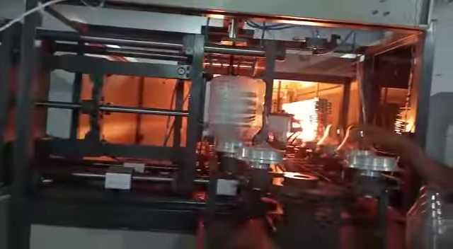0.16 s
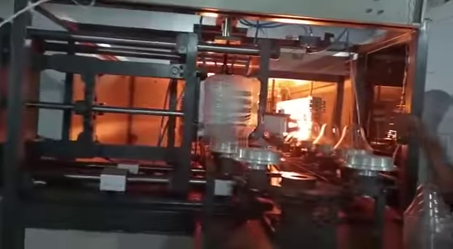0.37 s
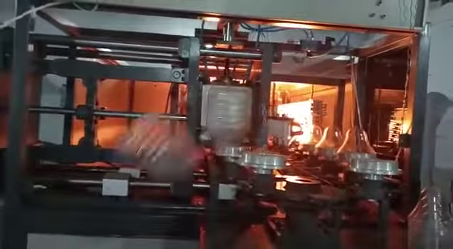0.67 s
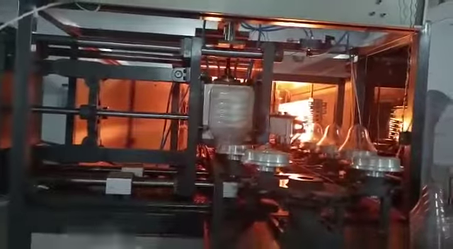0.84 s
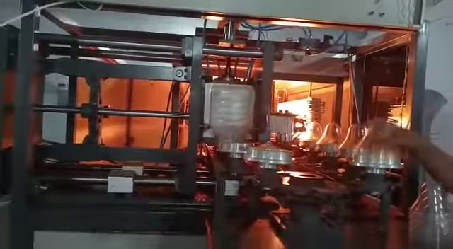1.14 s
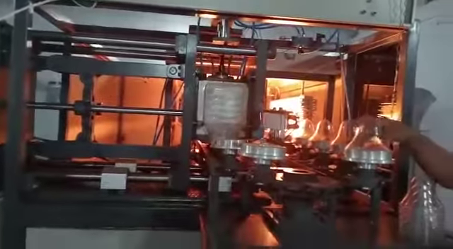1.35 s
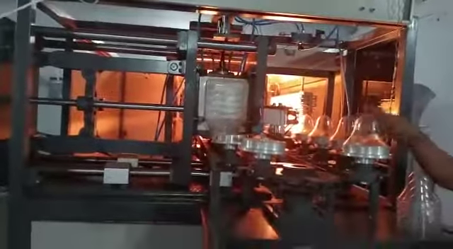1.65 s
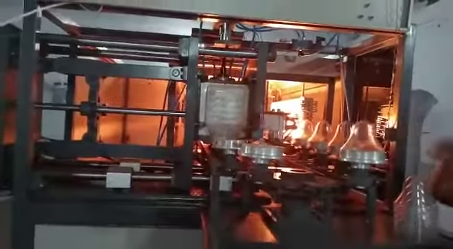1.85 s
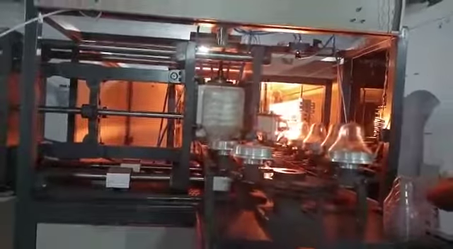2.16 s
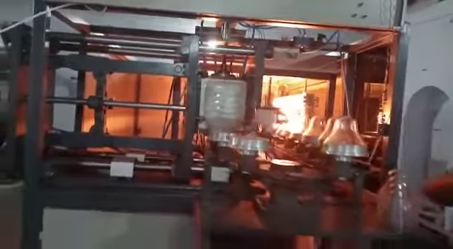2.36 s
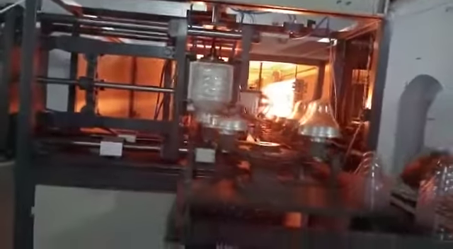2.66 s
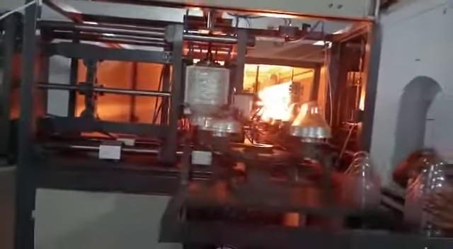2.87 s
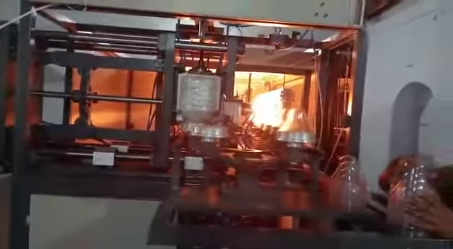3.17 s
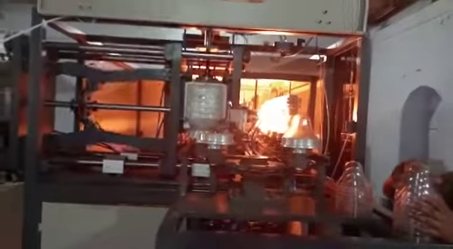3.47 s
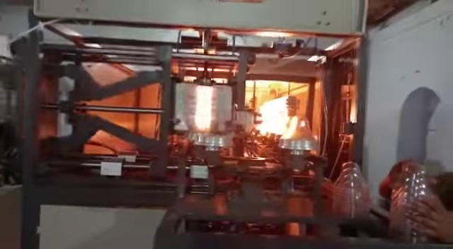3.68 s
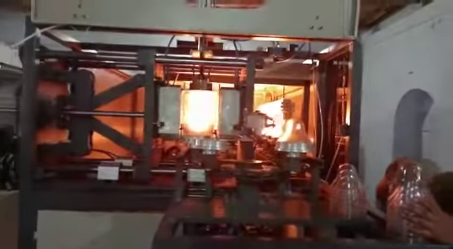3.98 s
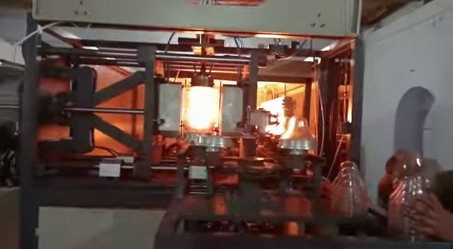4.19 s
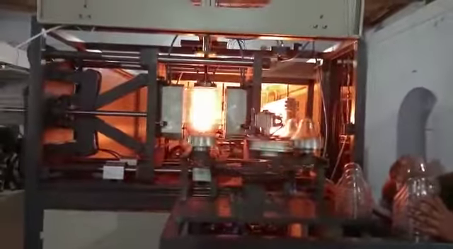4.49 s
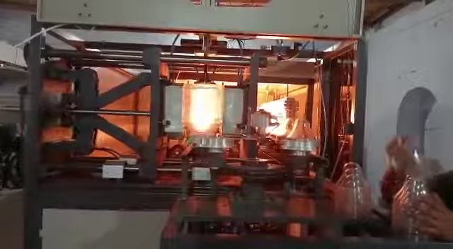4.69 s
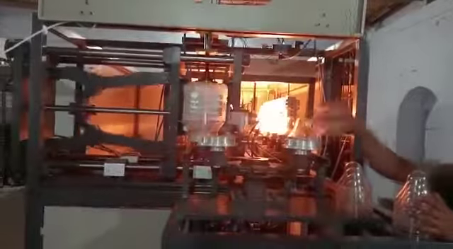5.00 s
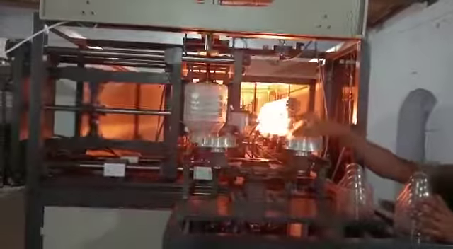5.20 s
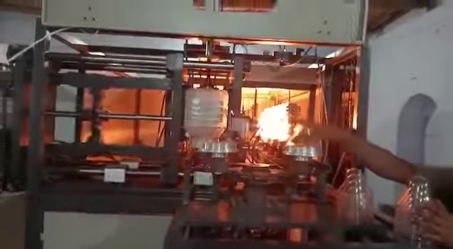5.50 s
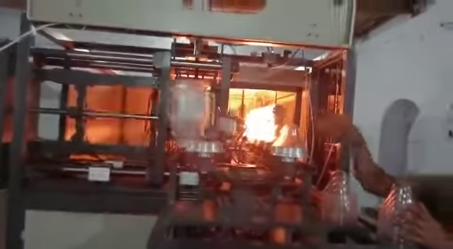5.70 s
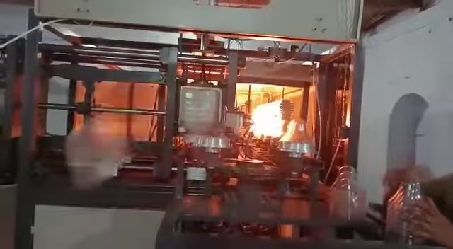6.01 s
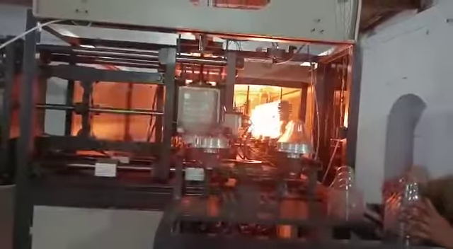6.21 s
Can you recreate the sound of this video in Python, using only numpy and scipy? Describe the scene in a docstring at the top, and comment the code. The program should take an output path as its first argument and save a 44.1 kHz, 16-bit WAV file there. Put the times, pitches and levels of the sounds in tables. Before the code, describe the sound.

Pneumatic bottle-blowing machine cycles with loud bursts of hissing compressed air, metallic knocks and sliding carriage rumble over a throbbing compressor and fan rush.

```python
"""A fading hiss and muffler roar open the scene: a pneumatic bottle-blowing machine in a hard-walled workshop.
Its valves release jets of coloured noise; gliding noise bands make the mufflers roar and the jets whistle.
The carriage rumbles in shaped noise, the frame knocks in short noise bursts, and a plastic bottle clatters.
Behind it an air compressor throbs as a sum of turning-rate multiples, over the noise of fans and shop.
One small microphone feeds both channels."""
import sys
import numpy as np
from scipy import signal
from scipy.fft import rfft, irfft, next_fast_len
from scipy.io import wavfile
from scipy.ndimage import uniform_filter1d

SR = 44100
rng = np.random.default_rng(int(sys.argv[2]) if len(sys.argv) > 2 else 0)


def materialize(psi):
    """Save the field psi as 16-bit PCM at rate SR to the path in sys.argv[1].

    A 1-D psi becomes a single channel; in a 2-D psi each row is a channel.
    """
    bounded = np.clip(np.atleast_2d(psi).T, -1, 1)
    quanta = np.round(bounded * 32767).astype(np.int16)
    wavfile.write(sys.argv[1], SR, quanta)


N = 279989  # length in samples


def from_db(db):
    """Amplitude factor for a level in dB."""
    return 10 ** (np.asarray(db) / 20)


def rms_one(x):
    """Scale a signal to rms 1."""
    return x / np.sqrt(np.mean(x ** 2) + 1e-20)


def seconds():
    """The time of every sample."""
    return np.arange(N) / SR


def in_time(rows):
    """Each column of a curve, joined by straight lines, at every sample."""
    s, *columns = np.transpose(rows)
    return [np.interp(seconds(), s, column) for column in columns]


def drift(hz):
    """Slow chance with rms 1, weaker above the given rate; drawn at every 40th sample."""
    coarse = np.arange(0, N + 40, 40)
    rates = np.fft.rfftfreq(len(coarse), coarse[1] / SR)
    smooth = 1 / (1 + (rates / hz) ** 2)
    slow = irfft(rfft(rng.standard_normal(len(coarse))) * smooth, len(coarse))
    return np.interp(np.arange(N), coarse, rms_one(slow))


def noise(spectrum, band=(0, np.inf)):
    """Noise of a given colour, with rms 1 inside the band."""
    size = next_fast_len(N, True)
    hz = np.fft.rfftfreq(size, 1 / SR)
    points, db = np.transpose(spectrum)
    colour = from_db(np.interp(np.log(hz + 1), np.log(points), db))
    low_fade = hz / (hz + points[0] / 2)
    bins = rfft(rng.standard_normal(size)) * colour * low_fade
    inside = irfft(bins * (hz >= band[0]) * (hz < band[1]), size)
    return irfft(bins, size)[:N] / np.std(inside)


def resonate(x, modes):
    """Parallel two-pole resonances, each with its peak gain near its dB value."""
    out = 0
    for hz, width_hz, db in modes:
        r = np.exp(-np.pi * width_hz / SR)
        zeros = np.array([1, 0, -1]) * (1 - r * r) / 2
        poles = [1, -2 * r * np.cos(2 * np.pi * hz / SR), r * r]
        out = out + from_db(db) * signal.lfilter(zeros, poles, x + 1e-18)
    return out


def cut(x, hz, kind, order=2):
    """Butterworth filter."""
    sos = signal.butter(order, np.clip(hz, 10, .45 * SR), kind, fs=SR, output="sos")
    return signal.sosfilt(sos, x)


def gliding_band(hz, width_hz, order=2):
    """Turbulence in a resonance whose centre moves: low noise shifted up to a phase; rms 1."""
    real, imaginary = cut(rng.standard_normal((2, N)), width_hz / 2, "low", order=order)
    phase = 2 * np.pi * np.cumsum(hz) / SR
    return rms_one(real * np.cos(phase) + imaginary * np.sin(phase))


def gate(start, end, attack_s, t60):
    """Fully open at the start, dying away after the end by 60 dB in t60 seconds."""
    out = np.zeros(N)
    first = max(0, int((start - attack_s) * SR))
    at = np.arange(first, min(N, int((end + 1.5 * t60) * SR)))
    t = at / SR
    rise = np.clip((t - start) / attack_s + 1, 0, 1)
    out[at] = rise * np.exp(-np.log(1000) * np.maximum(t - end, 0) / t60)
    return out


def gate_rows(rows, attack_s, t60):
    """A gate held open from the first to the last row of a table."""
    return gate(rows[0][0], rows[-1][0], attack_s, t60)


def reflections(x, longest_s, echo_db, count=10):
    """Nearby steel panels return faint copies that ripple the spectrum."""
    out, gain = x.copy(), from_db(echo_db)
    for share in rng.uniform(.1, 1, count):
        lag = 1 + int(share * longest_s * SR)
        out[lag:] += gain * x[:-lag]
    return out / np.sqrt(1 + count * gain ** 2)


def flecks(x, depth_db, size):
    """A turbulent jet's colour keeps shifting: narrow bands flare and fade."""
    cells = signal.stft(x, nperseg=512)[2]
    patch = rng.standard_normal(cells.shape)
    for _ in range(2):
        patch = uniform_filter1d(patch, size=3, axis=0)
        patch = uniform_filter1d(patch, size, axis=1)
    flickering = signal.istft(cells * from_db(depth_db * rms_one(patch)))[1][:N]
    return np.std(x) * rms_one(flickering)


def ringing(bursts, modes):
    """Resonances excited by noise, let out in dying bursts."""
    push = sum(from_db(db) * gate(s + 0.0022, s, attack_s=0.0024, t60=t60) for s, db, t60 in bursts)
    return push * rms_one(resonate(rng.standard_normal(N), modes))


def tone(rows, width_hz):
    """A noisy, loosely pitched note."""
    hz, db = in_time(rows)
    return from_db(db) * gate_rows(rows, attack_s=.02, t60=0.2) * gliding_band(hz, width_hz)


TURN_S = 0.07254  # one turn of the compressor
FIRST_ORDER, LAST_ORDER = 7, 60  # multiples of the turning rate
# The multiples above the table: relative level of the first, and the slope from there
OVERTONE_DB, OVERTONE_DB_PER_OCTAVE = -10, -12.5
# The compressor's lowest multiples, from FIRST_ORDER upwards. Each entry: relative level in dB.
ORDER_DB = [-6, -0.5, -15, -6, 1.5, -9.5, -4, -5.5, -29, -6.5, -6.5]
# Beats within every turn, which set the phases. Each row: seconds into the turn, weight in dB, centre in Hz.
STROKES = [(0.0315, 3.5, 113), (0.0505, -7, 205), (0.0588, -6, 245), (0.0047, -9.5, 190)]


def compressor():
    """Multiples of the turning rate, phased by four strokes, throb; the room smears them and a leak spits in step."""
    orders = np.arange(FIRST_ORDER, LAST_ORDER + 1)
    hz, higher = orders / TURN_S, orders[len(ORDER_DB):]
    overtones_db = OVERTONE_DB + OVERTONE_DB_PER_OCTAVE * np.log2(higher / higher[0])
    levels_db = np.concatenate([ORDER_DB, overtones_db])
    beats = 0
    for s, db, centre in STROKES:
        weight = from_db(db) / (1 + (hz / centre - centre / hz) ** 2 * 2)
        beats = beats + weight * np.exp(-2j * np.pi * hz * s)
    # chance phases grow with the order
    smear = rng.standard_normal(len(orders)) * (orders / 22) ** 4
    phases = np.angle(beats) + smear
    turn = np.linspace(0, TURN_S, 2048)
    cycle = from_db(levels_db) @ np.cos(2 * np.pi * np.outer(hz, turn) + phases[:, None])
    thump = rms_one(np.interp(seconds() % TURN_S, turn, cycle))
    pulse_db = 2.0 * np.cos(2 * np.pi * (seconds() - .068) / TURN_S)
    spit = from_db(pulse_db) * gliding_band(np.full(N, 9300), width_hz=1200)
    return thump * from_db(0.97 * drift(9.4)) + from_db(-8.5) * spit


# Levels when the throb is at -30 dB (the rush before its low cut), and their shares of the throb's swing in dB
SHOP_DB, SHOP_FOLLOWS = -29, 0.84
RUMBLE_DB, RUMBLE_FOLLOWS = -36, .5
# The level of the throb, which the shop's rush and rumble partly follow; it swells and sinks and is lowest
# during many blasts. Each row: time in seconds, level in dB.
THROB_LEVEL = [(0, -30.5), (0.22, -25.5), (0.3, -35), (0.82, -38.5), (0.92, -31.5), (1.68, -31.5),
               (1.85, -36), (2.2, -33), (2.58, -28.5), (2.8, -21), (3.23, -21.5), (3.33, -29), (3.6, -48),
               (4.0, -37), (4.3, -32), (4.55, -32.5), (4.9, -41.5), (5.2, -34), (5.45, -27), (5.65, -30.5),
               (6.0, -41), (6.15, -30)]
# Colour of the fans' rush across the shop. Each row: frequency in Hz, relative density in dB.
SHOP_COLOUR = [(240, 6), (420, -1.5), (1030, -3.4), (1320, -5.5), (2250, -3.5), (4270, -16), (5210, -13.5),
               (7180, -18), (9160, -25), (10400, -20.5), (15400, -26)]
# Colour of the shop's low rumble. Each row: frequency in Hz, relative density in dB.
SHOP_BASS_COLOUR = [(20, -20), (45, -10), (75, -3), (120, 6), (190, 1), (330, -9), (600, -28)]


def background():
    """The compressor over the rush of oven fans and the low rumble of the shop, swelling together."""
    throb_db, = in_time(THROB_LEVEL)
    swing_db = throb_db + 30
    rush = cut(flecks(noise(SHOP_COLOUR), depth_db=1.5, size=10), 266, "high", order=3)
    shop = from_db(SHOP_DB + SHOP_FOLLOWS * swing_db) * rush
    rumble = from_db(RUMBLE_DB + RUMBLE_FOLLOWS * swing_db) * noise(SHOP_BASS_COLOUR)
    return from_db(throb_db) * compressor() + shop + rumble


# A plastic bottle strikes. Each row: start in seconds, level before the treble cut in dB,
# 60 dB decay in seconds, top of the contact's brightness in Hz.
CLATTER = [(1.179, -22, 0.08, 8500), (1.246, -14.5, 0.12, 5900), (1.268, -9.5, 0.091, 4800),
           (1.312, -19, 0.034, 6000)]
# Resonances of the bottle's thin wall. Each row: centre in Hz, width in Hz, relative gain in dB.
BOTTLE_WALL = [(2970, 530, 2), (3880, 430, 2.5), (5430, 680, -1), (7000, 800, -2)]


def bottle():
    """A falling bottle's contacts sound its thin wall, each contact with its own upper limit."""
    out = 0
    for s, db, t60, top_hz in CLATTER:
        out = out + cut(ringing([(s, db, t60)], BOTTLE_WALL), top_hz, "low", order=6)
    return out


# Dry guides squeak, one table each. Each row: time in seconds, pitch in Hz, level in dB.
SQUEAKS = [
    [(4.475, 1866, -38), (4.5, 2080, -37), (4.525, 2150, -34)],
    [(5.685, 2570, -24), (5.705, 2560, -26)],
    [(5.745, 2065, -24), (5.765, 1960, -24)],
    [(6.055, 1065, -27), (6.08, 1080, -35)],
]


def squeaks():
    """Each dry guide gives one thin line that wavers in pitch and flutters in level."""
    out = 0
    for rows in SQUEAKS:
        hz, db = in_time(rows)
        wavering_hz = hz + 45 * drift(100)
        line = np.sqrt(2) * np.sin(2 * np.pi * np.cumsum(wavering_hz) / SR)
        out = out + from_db(db + 2 * drift(25)) * gate_rows(rows, attack_s=0.023, t60=0.083) * line
    return out


# Blows on the frame. Each row: start in seconds, level in dB, centre in Hz, 60 dB decay in seconds.
KNOCKS = [(0.208, -19.5, 238, 0.13), (0.308, -19, 449, 0.32), (0.549, -25, 2000, 0.046),
          (0.599, -18, 430, 0.28), (0.661, -18, 447, 0.14), (0.69, -17.5, 740, 0.27),
          (0.738, -14.5, 300, 0.054), (0.84, -21, 1080, 0.05), (1.18, -22.5, 1380, 0.36),
          (1.194, -25, 1250, 0.15), (1.207, -19, 1360, 0.15), (1.237, -22.5, 300, 0.78),
          (1.645, -25, 1840, 0.33), (1.753, -12, 500, 0.056), (1.754, -14, 135, 0.08),
          (3.332, -15, 1540, 0.11), (4.06, -17.5, 746, 0.12), (4.074, -18.5, 940, 0.1),
          (4.718, -19, 270, 0.15), (5.461, -19.5, 1090, 0.6), (5.597, -14, 756, 0.18),
          (5.645, -12.5, 420, 0.15), (5.688, -22, 650, 0.08), (5.732, -14, 600, 0.06),
          (5.867, -18, 1300, 0.13), (5.919, -24.5, 130, 0.11)]


def knocks():
    """A blow wakes a dense band of noise around its centre; the workshop answers with a faint half-second tail."""
    out, t = np.zeros(N), np.arange(SR // 2) / SR
    for s, db, hz, t60 in KNOCKS:
        body = cut(rng.standard_normal(len(t)), [hz / 3.2, hz * 1.52], "band", order=2)
        decay = np.exp(-np.log(1000) * t / t60)
        room_tail = from_db(-37.0) * np.exp(-np.log(1000) * t / .5)
        blow = from_db(db) * rms_one(body) * (decay + room_tail)
        at = int(s * SR)
        out[at:at + len(t)] += blow[:N - at]
    return out


# Carriage and turntable on the move, one table per travel. Each row: time in seconds, rumble level in dB.
TRAVELS = [
    [(0.262, -24.5), (0.405, -18.5), (0.47, -38)],
    [(0.56, -18), (0.618, -17.5), (0.9, -35.5)],
    [(1.716, -24), (1.744, -21), (1.92, -36.5)],
    [(3.335, -20.5), (3.45, -22), (3.55, -26.5), (4.02, -33)],
    [(4.565, -23.5), (4.675, -28.5), (4.721, -22.5), (5.0, -29.5), (5.14, -27), (5.22, -33.5)],
    [(5.53, -25.5), (5.644, -21.5), (5.686, -24), (6.102, -25), (6.13, -62)],
]
# Colour of the sliding steel. Each row: frequency in Hz, relative density in dB.
RUMBLE_COLOUR = [(25, -38), (60, -6), (110, -1), (300, 0.5), (700, 1.5), (2000, -2.5), (3500, -6),
                 (7000, -16)]


def carriage():
    """Sliding steel rumbles and chatters on its guides: coloured noise with a fluttering level."""
    motion = sum(from_db(in_time(rows)[0]) * gate_rows(rows, attack_s=0.02, t60=0.26) for rows in TRAVELS)
    rumble = reflections(noise(RUMBLE_COLOUR, band=(300, 1400)), longest_s=.02, echo_db=-23.5)
    return motion * rumble * from_db(1.25 * drift(25))


# A thin leak while the machine waits. Each row: time in seconds, centre in Hz, level in dB.
LEAK = [(0.95, 9600, -33), (1.69, 9570, -31.5)]
# The last of the air sings through the port. Each row: time in seconds, centre in Hz, level in dB.
DREGS = [(2.05, 5030, -29), (2.25, 5170, -33), (2.42, 5180, -36.5)]
# The last jet's bright band sinks in pitch and swells. Each row: time in seconds, centre in Hz, level in dB.
SIZZLE = [(5.82, 13100, -25), (5.9, 12600, -23), (5.98, 10300, -18), (6.11, 9820, -16.5)]


def broad_jets():
    """Leaking, dwindling and sizzling air as broad gliding bands of turbulence."""
    return tone(DREGS, width_hz=570) + tone(SIZZLE, width_hz=3800) + tone(LEAK, width_hz=1700)


# Edge tones of the jets, one table each. Each row: time in seconds, pitch in Hz, level in dB.
WHISTLES = [
    [(0, 11270, -30), (0.15, 11000, -52)],
    [(3.47, 11100, -30), (3.57, 11250, -27), (3.87, 11100, -24), (4.01, 11230, -28)],
    [(4.73, 11155, -26), (4.85, 11110, -18), (4.91, 11095, -30), (5.04, 11055, -26.5), (5.31, 10995, -27)],
    [(5.74, 10900, -30), (5.79, 11000, -24)],
    [(3.68, 9200, -29), (3.95, 9250, -32)],
]
# How wide each edge tone is. Each entry: width in Hz.
WHISTLE_WIDTHS = [60, 230, 55, 140, 170]


def whistles():
    """Jets striking edges whistle as narrow, wandering bands."""
    return sum(tone(rows, width_hz) for rows, width_hz in zip(WHISTLES, WHISTLE_WIDTHS))


# Escaping air in the mufflers, one table per emptying. Each row: time in seconds, roar level in dB.
ROARS = [
    [(0.0, -18.5), (0.142, -44), (0.2, -36.5)],
    [(1.76, -23), (1.82, -18), (1.98, -14.5), (2.27, -17.5), (2.6, -31.5)],
    [(3.31, -27), (3.52, -19.5), (3.99, -18), (4.11, -37)],
    [(4.704, -24.5), (4.894, -18.3), (5.266, -21), (5.4, -42)],
]
# The muffler's moving note. Each row: time in seconds, centre in Hz.
ROAR_PITCH = [(0, 2600), (1.78, 2960), (2.0, 2705), (2.4, 2257), (3.3, 2964), (4.0, 3007), (5.3, 2883)]
# A narrow ridge gliding in the roar. Each row: time in seconds, centre in Hz.
RIDGE_PITCH = [(2.0, 2530), (2.35, 2166), (3.5, 2600), (3.8, 2405), (4.0, 2320), (4.8, 2760), (5.0, 2605)]
# Narrow resonances of the muffler shell. Each row: centre in Hz, width in Hz, relative gain in dB.
SHELL = [(2080, 80, -1), (2723, 35, 12), (3240, 50, -19)]


def mufflers():
    """Escaping air roars in a broad moving resonance, with a gliding ridge and a singing shell."""
    flow = sum(from_db(in_time(rows)[0]) * gate_rows(rows, attack_s=0.025, t60=0.96) for rows in ROARS)
    broad = gliding_band(in_time(ROAR_PITCH)[0], width_hz=1760, order=3)
    roar = flecks(rms_one(cut(broad, 910, "high", order=5)), depth_db=1.5, size=10)
    ridge = gliding_band(in_time(RIDGE_PITCH)[0], width_hz=310)
    shell = rms_one(resonate(rng.standard_normal(N), SHELL))
    return flow * (roar + from_db(-8.0) * ridge + from_db(-11.5) * shell)


# Short puffs at a valve port. Each row: start in seconds, level in dB, 60 dB decay in seconds.
PUFFS = [(0.80, -24.5, 0.68), (0.88, -25, 0.27), (4.05, -15.5, 0.53), (4.558, -16.5, 1),
         (5.522, -17.5, 0.23)]
# Resonances of that port. Each row: centre in Hz, width in Hz, relative gain in dB.
PORT = [(5000, 250, 4), (5420, 270, -1), (9330, 440, 2.5)]


def puffs():
    """Short puffs of air sound the resonances of a valve port."""
    return ringing(PUFFS, PORT)


# Jets of air, one table per valve opening. Each row: time in seconds, hiss level in dB,
# fizz above the hiss in dB.
EXHAUSTS = [
    [(0.0, -23.5, -9), (0.134, -44, -13.5), (0.25, -36, -11.5)],
    [(0.263, -17.5, -5.5), (0.473, -18.5, -12), (0.543, -26.5, -20)],
    [(0.558, -29, -6), (0.574, -20.5, -1), (0.86, -21.5, -5), (0.966, -35.5, 1), (1.45, -40.5, 2),
     (1.7, -44.5, 9.5)],
    [(1.714, -19.5, -6), (1.843, -16, -8.5), (2.249, -30, -9.5), (2.475, -41.5, -5.5), (2.58, -62, -16.5)],
    [(3.211, -30.5, 7), (3.241, -34.5, 12.5), (3.262, -51, 2.5)],
    [(3.277, -20, -2), (3.369, -18, -8), (3.975, -20, -7), (4.04, -23, -11)],
    [(4.054, -29, -4), (4.098, -19.5, -7), (4.15, -27, -5)],
    [(4.164, -21, -6), (4.401, -35, -12.5), (4.545, -32, -13.5)],
    [(4.563, -21.5, 0.5), (4.621, -20.5, -3), (5.27, -21.5, -5.5), (5.41, -50, -13.5)],
    [(5.532, -18, -7.5), (6.105, -18.5, -11.5), (6.237, -33, -1.5), (6.349, -48.5, 15)],
]
# Colour of the hiss. Each row: frequency in Hz, relative density in dB.
HISS_COLOUR = [(300, -27), (800, -10), (1500, -6), (2600, -2), (4200, -0.5), (5000, 1), (6200, -1.5),
               (8000, -3), (9100, 3.5), (10200, -2.5), (11300, -7), (12300, -14), (16000, -35)]
# Colour of the fizz. Each row: frequency in Hz, relative density in dB.
FIZZ_COLOUR = [(9000, -6.5), (11000, -1), (12000, -3.5), (14000, -4), (15500, -7)]


def exhausts():
    """Each valve snaps open; its turbulent jet hisses, with a changing share of fizz on top."""
    jet = flecks(noise(HISS_COLOUR, band=(6500, 11000)), depth_db=1.7, size=12)
    fizz = flecks(noise(FIZZ_COLOUR, band=(11800, 15400)), depth_db=1.7, size=12)
    out = 0
    for rows in EXHAUSTS:
        hiss_db, fizz_db = in_time(rows)
        valve = gate_rows(rows, attack_s=.012, t60=.09)
        air = valve * from_db(hiss_db) * (jet + from_db(fizz_db) * fizz)
        out = out + reflections(air, longest_s=.014, echo_db=-20)
    # one opening begins with a crack
    crack = from_db(-15.5) * gate(.5495, 0.55, attack_s=0.0014, t60=0.07) * jet
    return out + crack


def scene():
    """Shop, bottle, steel and air together, the same on both channels."""
    steel = squeaks() + knocks() + carriage()
    air = broad_jets() + whistles() + mufflers() + puffs() + exhausts()
    return np.tile(background() + bottle() + steel + air, (2, 1))


MIC_LOW_CUT_HZ, CUTOFF_HZ = 44, 15550


def record(dry):
    """One small microphone on both channels: no deep bass, rounded peaks, a steeply cut top."""
    rounded = 1.15 * np.tanh(cut(dry, MIC_LOW_CUT_HZ, "high", order=2) / 1.1)
    top_cut = signal.ellip(12, .1, 80, CUTOFF_HZ, fs=SR, output="sos")
    return signal.sosfilt(top_cut, rounded)


dry = scene()
out = record(dry)
materialize(out)
```